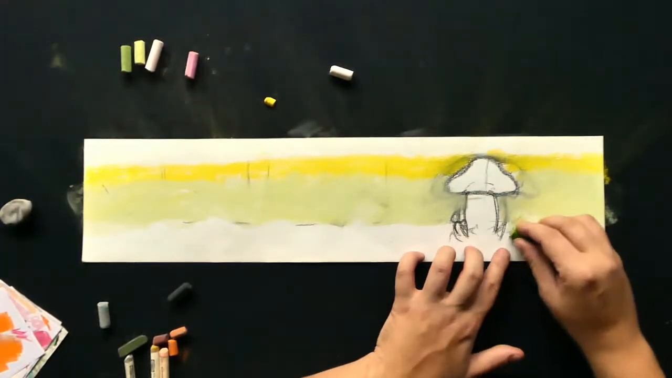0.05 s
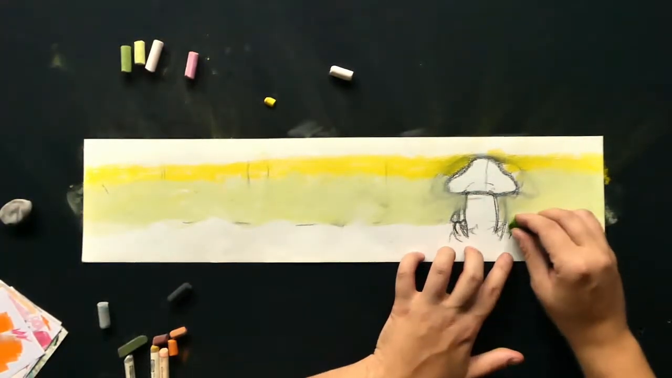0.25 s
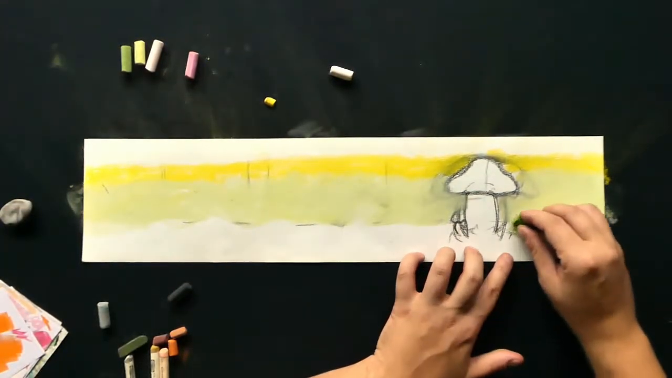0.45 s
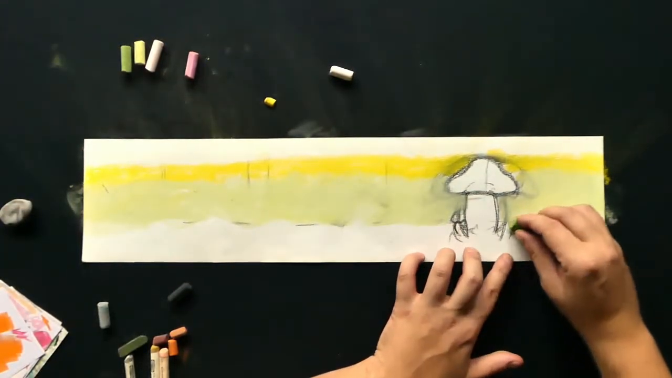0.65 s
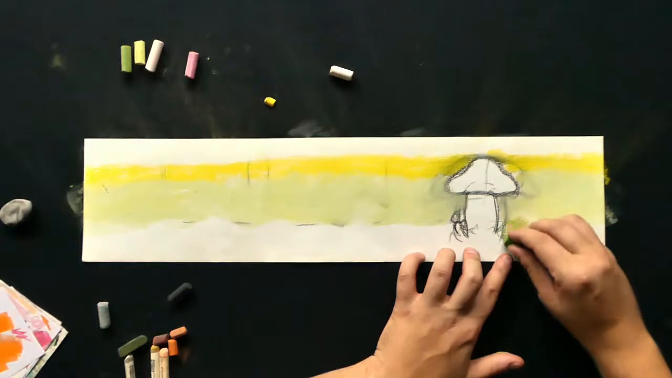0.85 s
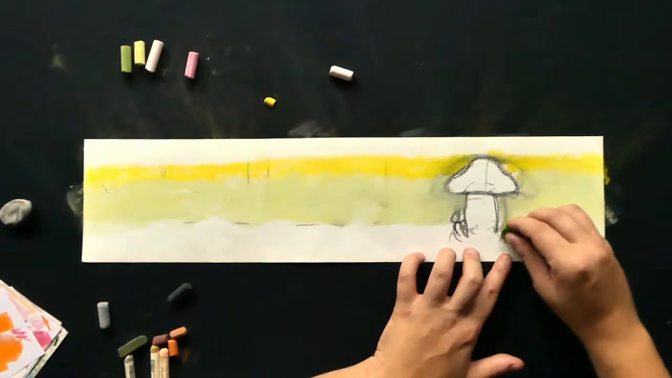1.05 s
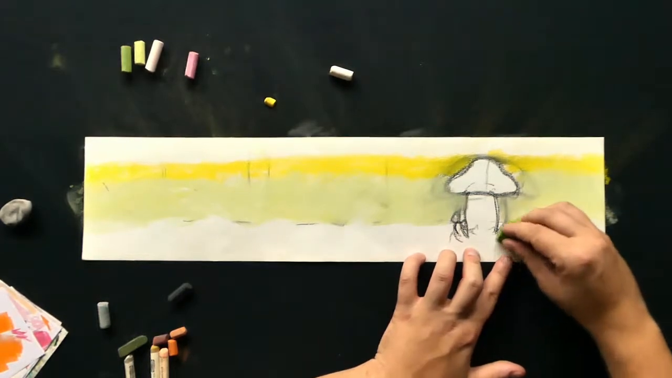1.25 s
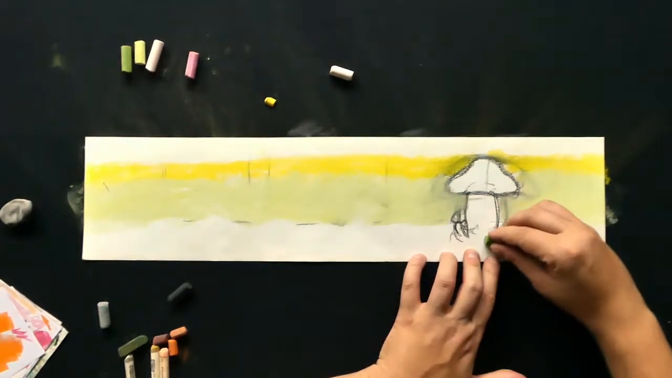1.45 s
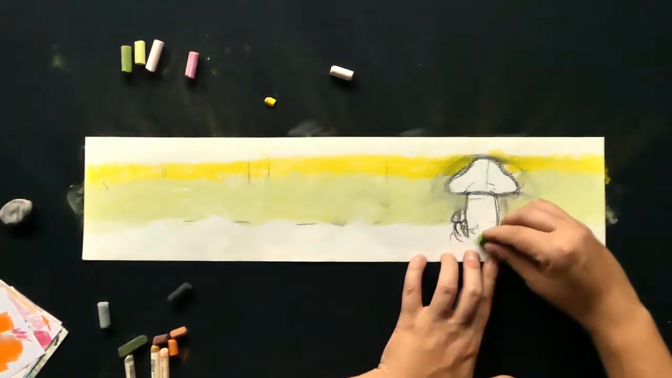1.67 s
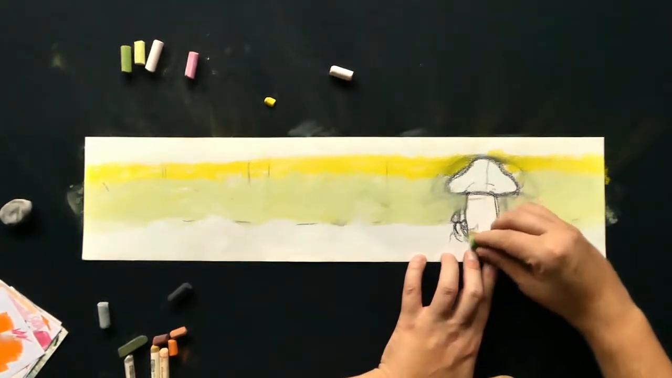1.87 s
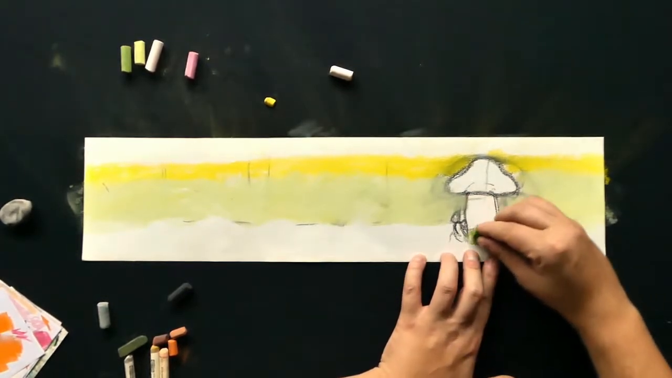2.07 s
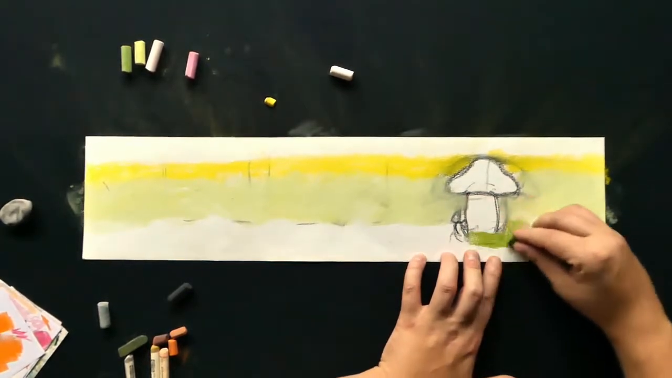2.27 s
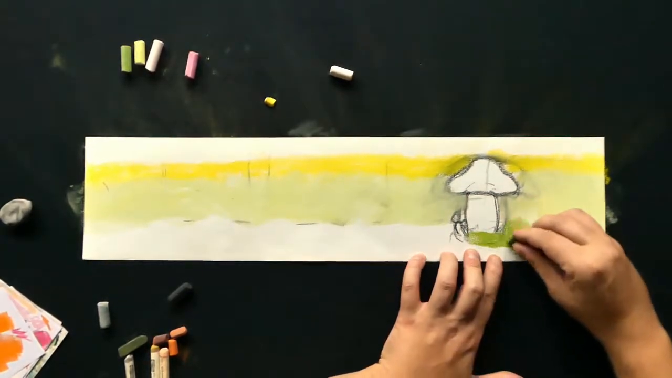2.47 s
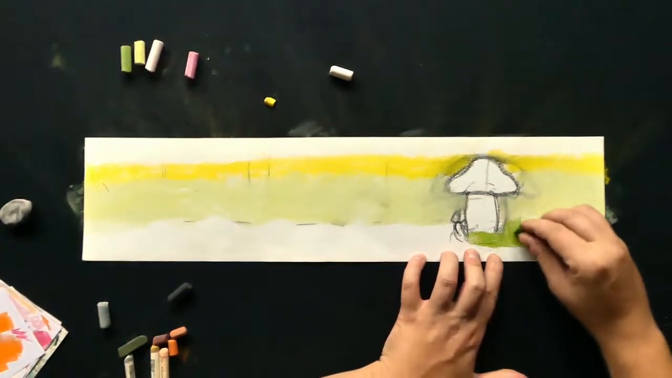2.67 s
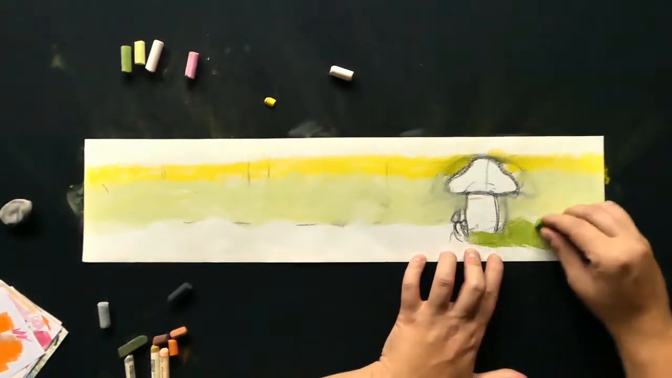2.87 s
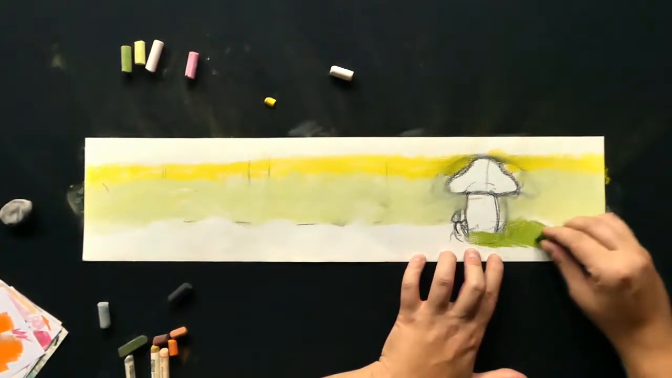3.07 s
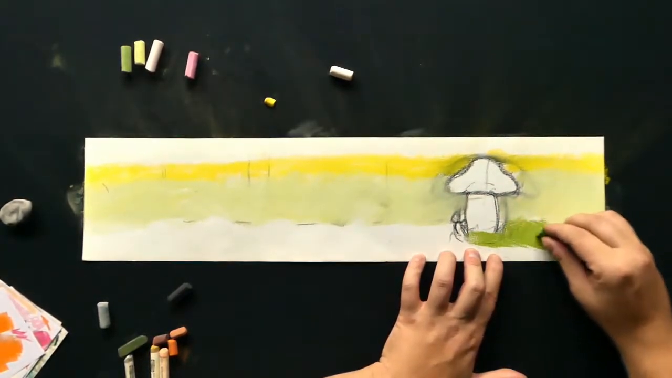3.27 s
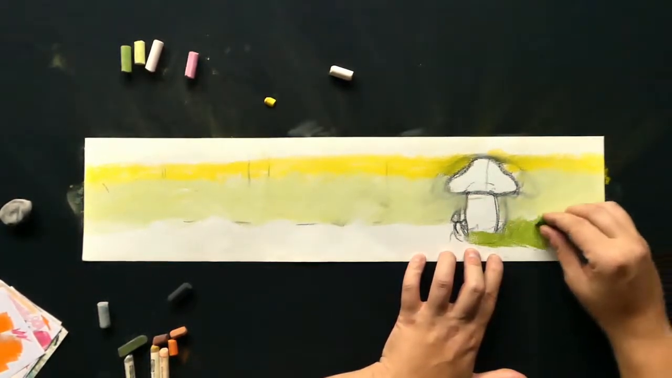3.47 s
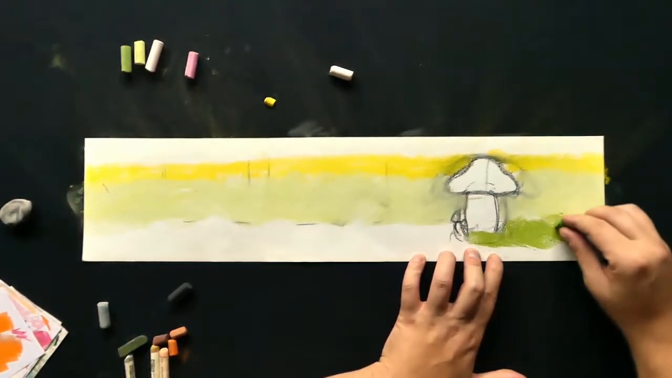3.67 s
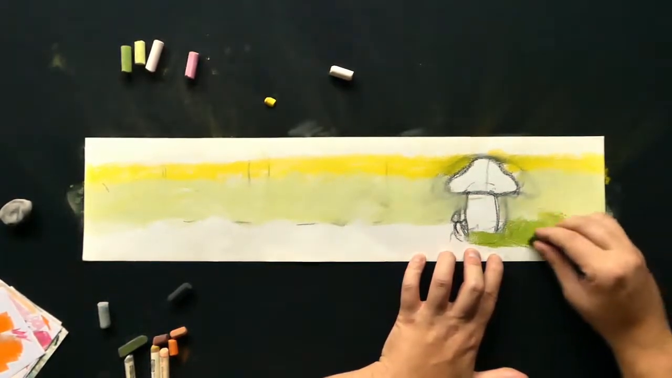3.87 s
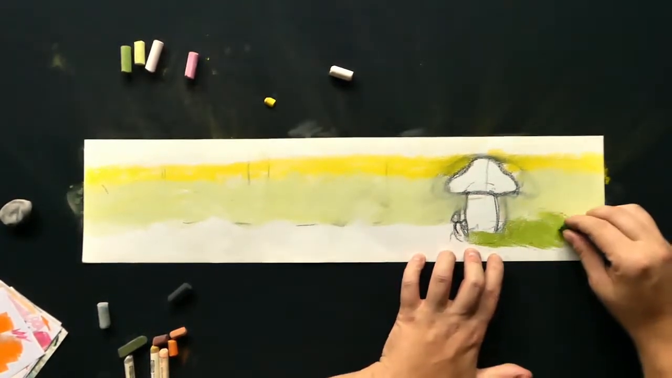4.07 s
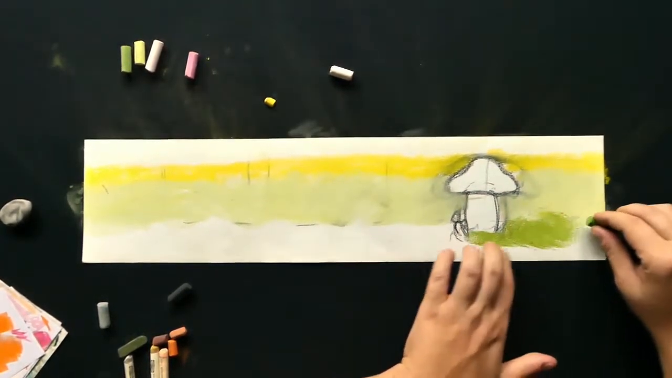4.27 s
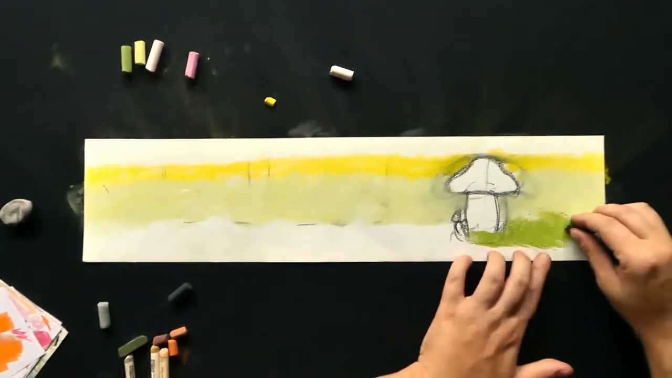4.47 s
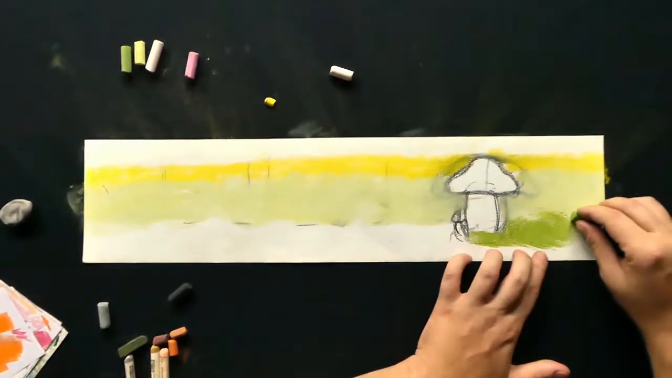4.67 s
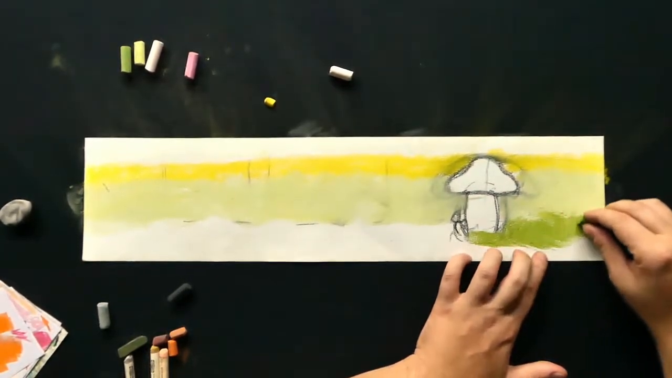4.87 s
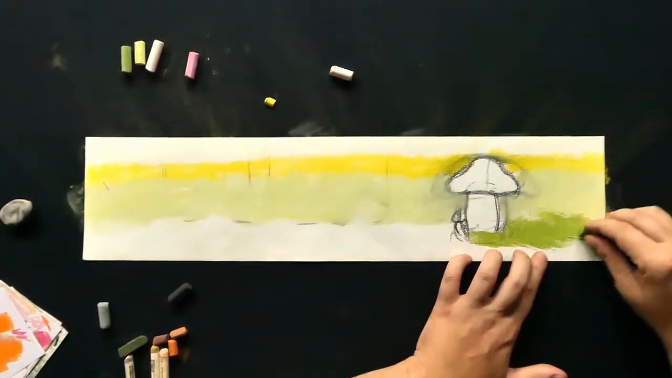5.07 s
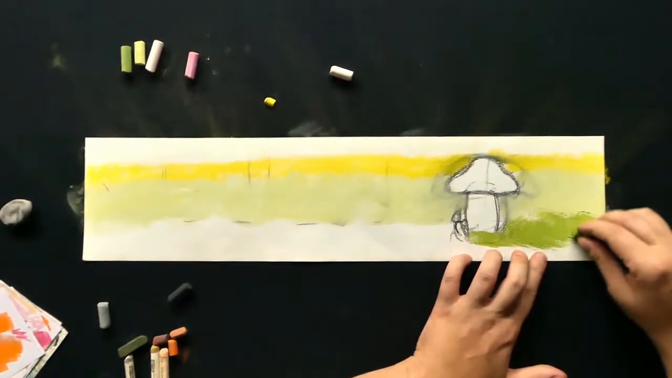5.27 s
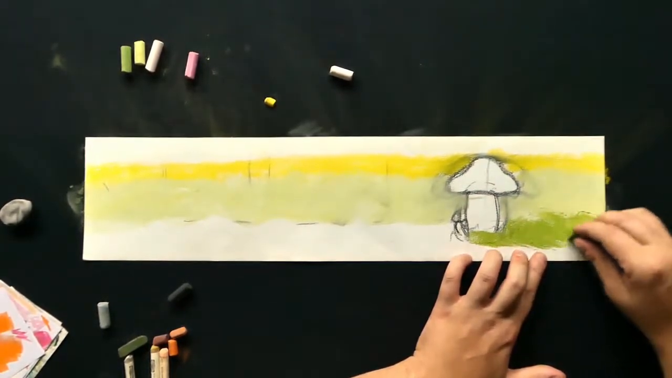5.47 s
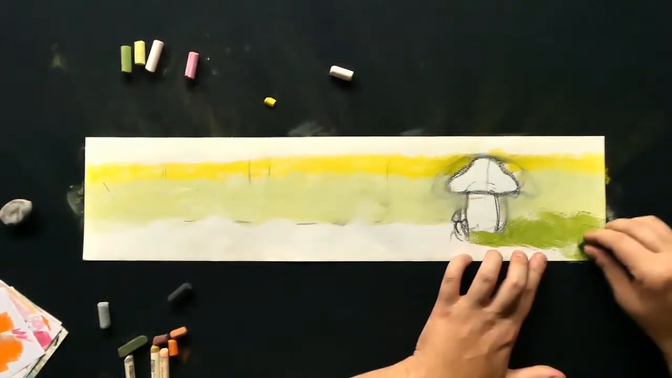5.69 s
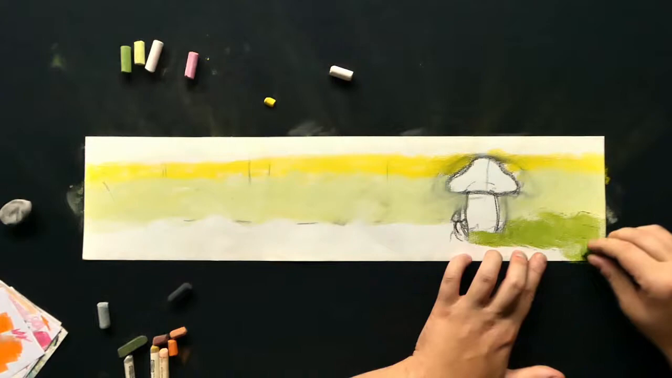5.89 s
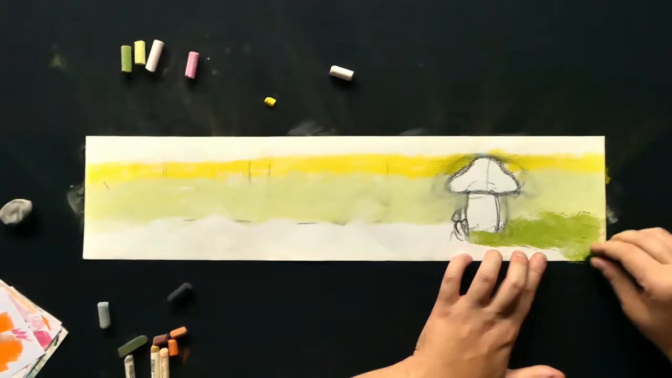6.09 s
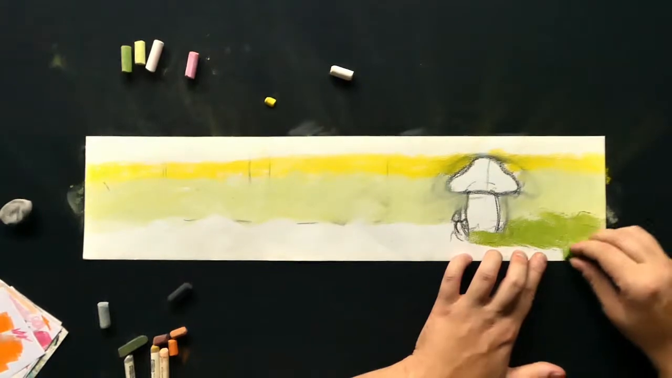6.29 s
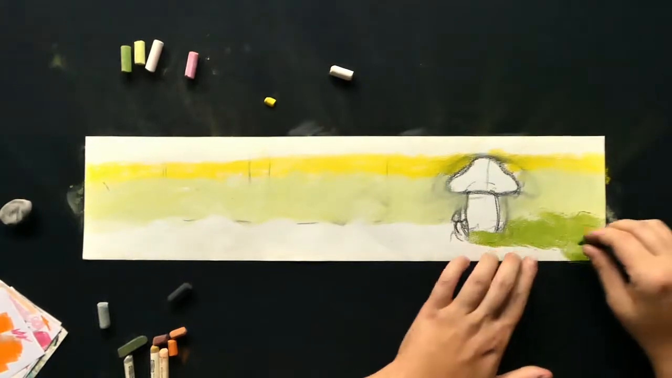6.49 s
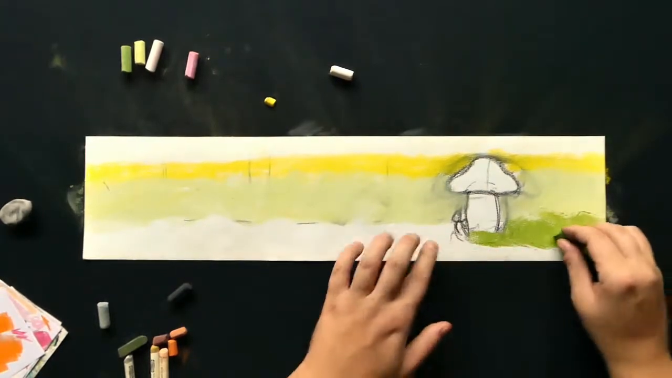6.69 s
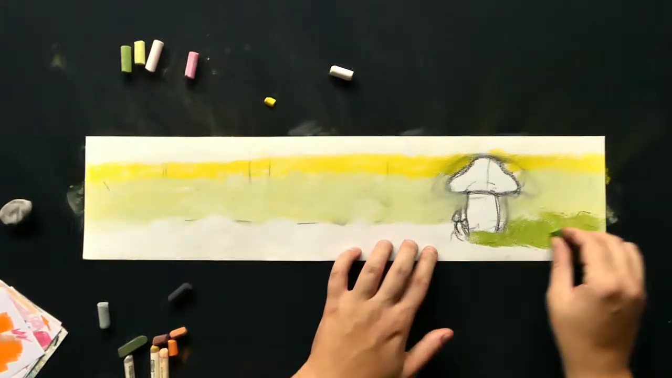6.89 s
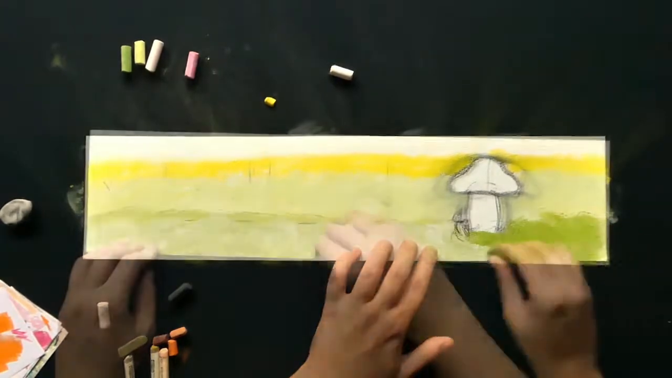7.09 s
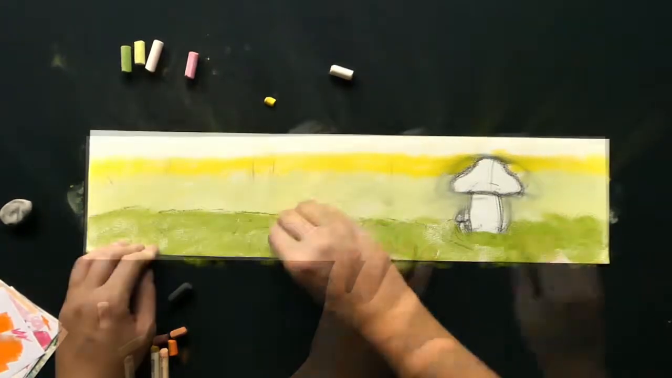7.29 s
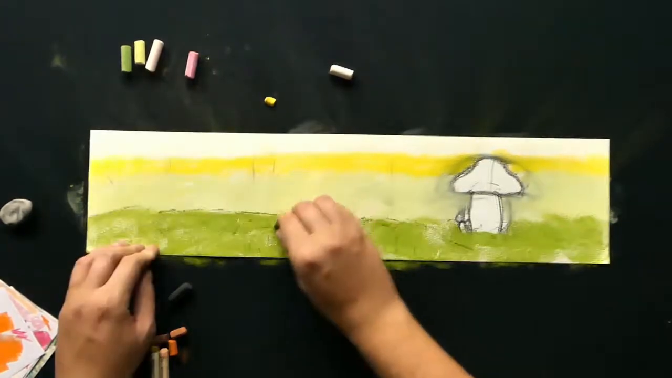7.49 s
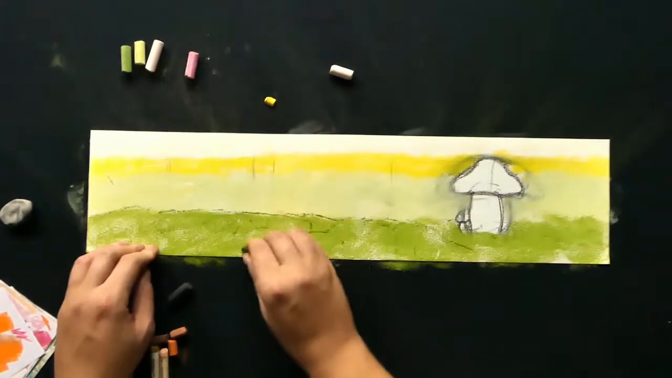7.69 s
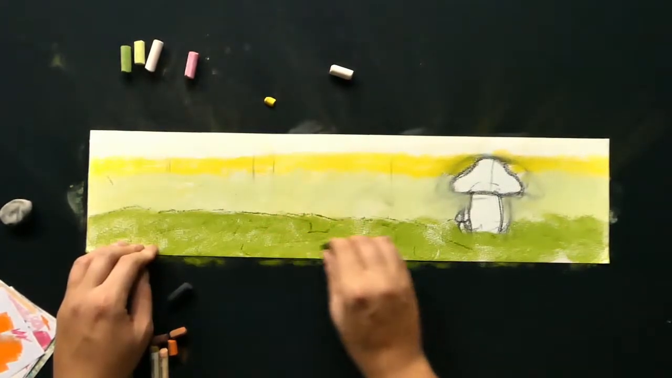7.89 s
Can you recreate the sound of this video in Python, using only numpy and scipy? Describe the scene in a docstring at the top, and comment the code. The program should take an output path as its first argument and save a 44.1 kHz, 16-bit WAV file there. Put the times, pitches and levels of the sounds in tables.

```python
"""A bright, dry rasp scrubs to and fro: a pastel stick on thin paper, close under a mono microphone.
The rasp is clumpy grit noise, coloured from dull to bright; the sheet under the stick and the table top
answer lower down through their own modes. Twice the stick lifts, ticks as it lands again and knocks
the table. The arm rumbles softly on the wood, short reflections follow, and a quiet room hums behind."""
import sys
import numpy as np
from scipy import signal
from scipy.fft import rfft, irfft, next_fast_len
from scipy.io import wavfile
from scipy.ndimage import uniform_filter1d, map_coordinates

SR = 44100
rng = np.random.default_rng(int(sys.argv[2]) if len(sys.argv) > 2 else 0)


def generate_wav(sig):
    """Save sig (samples, or channels by samples) to the path in sys.argv[1] as 16-bit PCM at SR."""
    pcm = np.round(np.clip(np.atleast_2d(sig).T, -1, 1) * 32767).astype(np.int16)
    wavfile.write(sys.argv[1], SR, pcm)


N = 350154

# Strokes of the stick: top_speed_s, rise_s, fall_s (each spans 10 dB, before a layer's linger), rasp_db,
# brightness_db, then relative to the rasp: pinned_patch_db, loose_sheet_db, table_drive_db
STROKES = [(0.003, 0.013, 0.12, -42.5, -4.5, -18.5, -25, -24),
           (0.191, 0.051, 0.046, -44.5, -5.5, -16, -25, -25),
           (0.244, 0.023, 0.051, -46.7, -5.4, -18, -23, -16),
           (0.349, 0.037, 0.062, -52, -6, -18, -17, -8.5),
           (0.433, 0.031, 0.062, -45.7, -5.0, -16, -24, -21.5),
           (0.568, 0.065, 0.082, -50.5, -5.5, -16.5, -17, -11.5),
           (0.707, 0.032, 0.071, -53.5, -5.5, -11, -12.5, -4.5),
           (0.873, 0.059, 0.092, -45, -5.4, -11.5, -15.5, -16),
           (1.023, 0.023, 0.11, -45.5, -5.5, -10.1, -13, -17), (1.15, 0.032, 0.076, -46, -5, -12, -19, -16),
           (1.291, 0.023, 0.087, -48.5, -5.5, -10.5, -11.5, -15.5),
           (1.381, 0.07, 0.071, -46.5, -5, -8.5, -14.5, -21),
           (1.527, 0.022, 0.098, -52, -5.5, -8.9, -8.5, -15), (1.6, 0.03, 0.071, -52.5, -5, -14, -6.5, -12),
           (1.789, 0.074, 0.17, -49.5, -5.3, -8, -6.5, -14.5),
           (2.012, 0.085, 0.028, -43.5, -5, -8.5, -12, -25),
           (2.108, 0.089, 0.14, -49.5, -6, -5.2, -4.5, -17.0),
           (2.265, 0.026, 0.013, -38.5, -4, -18, -34, -35), (2.315, 0.14, 0.043, -42.5, -5, -7.5, -25, -31),
           (2.405, 0.08, 0.054, -47.5, -6, -6.5, -12.9, -17.5),
           (2.511, 0.029, 0.16, -46.9, -6, -10, -20, -19.5), (2.605, 0.048, 0.089, -42.5, -5, -7, -12, -21),
           (2.743, 0.045, 0.11, -43.6, -6.0, -7.5, -13, -19.5),
           (2.867, 0.066, 0.102, -41, -5.0, -7, -12.5, -29),
           (3.029, 0.11, 0.078, -43.5, -5, -5, -11, -19.5),
           (3.137, 0.038, 0.082, -39.5, -5.5, -7, -14.5, -29),
           (3.308, 0.16, 0.066, -49, -5, -5.5, -8.3, -15),
           (3.399, 0.053, 0.06, -39, -5.5, -7.5, -16.5, -28.5),
           (3.504, 0.058, 0.07, -42, -5.5, -7, -12.5, -25),
           (3.684, 0.122, 0.064, -44.0, -6, -6.3, -13, -18), (3.755, 0.032, 0.12, -45, -5.9, -4.5, -7, -23),
           (3.862, 0.05, 0.14, -41.5, -5, -7.5, -30, -26), (4.03, 0.11, 0.063, -39, -5.5, -7, -14, -20),
           (4.154, 0.022, 0.084, -55, -6.5, -6.5, -13, -12), (4.28, 0.015, 0.027, -71, -6, -13, -12, -11),
           (4.325, 0.018, 0.018, -69, -5, -4, -9.0, -14),
           (4.539, 0.043, 0.04, -56.5, -12.2, -12, -21, -8.8),
           (4.611, 0.051, 0.048, -56.5, -9.5, -9.5, -12.5, -2.5),
           (4.71, 0.038, 0.049, -46.5, -6.5, -8.5, -13.1, -18),
           (4.8, 0.028, 0.115, -45, -7, -8, -12, -13.5), (4.914, 0.035, 0.074, -41, -5.5, -6, -14.5, -25),
           (5.044, 0.079, 0.1, -47, -6, -6.0, -13.5, -18), (5.154, 0.055, 0.1, -41.5, -6, -6, -11.5, -24),
           (5.323, 0.035, 0.12, -41, -6.5, -7.3, -15.5, -18.5),
           (5.437, 0.034, 0.073, -44, -5, -5, -17, -33), (5.561, 0.066, 0.11, -40, -5, -8.5, -16, -33),
           (5.669, 0.11, 0.022, -45.5, -5, -3.5, -12, -21), (5.728, 0.067, 0.057, -40, -6, -6, -15, -19),
           (5.829, 0.047, 0.085, -42, -5.5, -6.5, -11, -20),
           (5.959, 0.063, 0.078, -41.5, -6.5, -6, -15, -18.9),
           (6.072, 0.047, 0.052, -43.5, -6.5, -7.5, -13, -14),
           (6.166, 0.044, 0.1, -41, -6, -7.5, -16.5, -23.5),
           (6.303, 0.068, 0.085, -41, -5.5, -9, -19.5, -23),
           (6.402, 0.016, 0.03, -47.4, -5.5, -5, -14.7, -29),
           (6.435, 0.027, 0.019, -48.5, -6, -8, -26, -34), (6.47, 0.03, 0.065, -63, -6.5, -6, -11, -9),
           (6.834, 0.039, 0.057, -51, -17, -7.5, -30, -22), (6.952, 0.017, 0.05, -45.5, -6, -5, -23, -30.5),
           (6.988, 0.041, 0.11, -33.5, -4.5, -12, -26.5, -28),
           (7.076, 0.057, 0.04, -34, -5.5, 0.5, -20, -29.1),
           (7.217, 0.12, 0.11, -37.5, -6, -9.5, -19.5, -27.5),
           (7.324, 0.11, 0.073, -40.5, -5.5, -2, -34, -24),
           (7.476, 0.049, 0.033, -38, -6, -6.5, -23, -23.8), (7.603, 0.066, 0.082, -35, -6, -3, -20, -26.5),
           (7.856, 0.06, 0.15, -39.5, -6.5, -8.5, -17.5, -26),
           (7.94, 0.1, 0.154, -36.5, -6.5, -11, -16.4, -32)]


def rasp():
    """Faster strokes break finer grains, so the hiss moves from the dull to the bright spectrum."""
    # Spectrum of a slow and of a fast stroke: pitch_hz, relative density_db (per Hz)
    dull = [(2590, -51), (4400, -16.5), (4770, -5), (5900, -5.5), (6770, -6.5), (7540, -8.5), (8290, -12.5),
            (9580, -13.5), (15700, -34)]
    bright = [(2590, -31), (4400, -15.5), (5110, -12.5), (5800, -9.5), (8250, -5), (9180, -1), (12600, -3),
              (14900, -10), (15700, -66)]
    dulling = 0.049  # dB of brightness lost per dB below the top of a stroke

    def shape(hz, t):
        peak_db, bright_db = np.transpose(STROKES)[3:5]
        power = swells(t, peak_db, linger=0.92)
        total = power.sum(0)
        share = power / total
        level_db = 10 * np.log10(total)
        brightness_db = bright_db @ share + dulling * (level_db - peak_db @ share)
        fast = np.clip((brightness_db + 8) / 6, 0, 1.4)  # 0 is dull, 1 is bright
        return (1 - fast) * along(dull, hz) + fast * along(bright, hz), level_db

    return radiate(grit(rough_db=1.5, clump_db=0.5), shape, patchy_db=1.5, size=256)


def sheet():
    """The loose sheet sounds low, the small patch pinned under the stick higher."""
    # What the loose sheet and the pinned patch radiate: pitch_hz, relative density_db (per Hz)
    loose_spectrum = [(600, -24), (950, -1.5), (1500, -2), (2080, -0.5), (2250, -6), (3000, -24)]
    patch_spectrum = [(1500, -34), (2150, -3.5), (2700, -1), (3600, -0.5), (4500, -4), (6000, -18)]
    # Resonances of sheet and patch: pitch_hz, width (in natural log of frequency)
    sheet_modes = [(1170, 0.08), (1620, 0.069), (1990, 0.02)]
    patch_modes = [(2880, 0.055), (3550, 0.035), (4350, 0.066)]
    peak_db, _, patch_db, sheet_db = np.transpose(STROKES)[3:7]
    loose = paper(peak_db + sheet_db, 1.384, sheet_modes, loose_spectrum, between_db=-12.5, order=0, size=512)
    patch = paper(peak_db + patch_db, 1.04, patch_modes, patch_spectrum, between_db=-12.5, order=3, size=256)
    return loose + patch


def paper(peak_db, linger, modes, spectrum, between_db, order, size):
    """Paper modes stay put; moving the stick changes how strongly each is driven."""
    # Coupling of the spot under the stick: time_s, three sheet modes, three patch modes
    # (coupling in dB, before the stretch below)
    spot = [(0, -3, -14, -11, -4, -3, -4), (.7, -5, -6, -11, -3, -2, -5), (.9, -4, -3.5, 0, -4, -9, -5),
            (1.4, -6, -4, -4, -1.5, -3, -1.5), (1.52, 0.5, -4, 2.5, -2, -3, -2),
            (1.95, 0, -0.5, 2.5, -4, -3.5, -8), (2.3, 0, 0.5, 3.5, -1.5, -1.5, 3.5),
            (2.6, -6, -1, -1.5, -8, -10, -11), (2.95, -13, -3.5, -4.5, -10, -7, -9),
            (3.2, -2, 1.5, -4, -7, -4.5, -5), (3.3, -2, -2, -9, -9, -2, -6), (3.5, -5, -3, -16, -4, -5, -5),
            (3.65, -16, -4, -2, -11, -4, -7.5), (3.8, -6, 0, -8, -7, -6, -6), (4.05, -5, -2, 0, -4, -4, -5),
            (4.3, 9, -1, -14, -12, -2, -4), (4.8, -7, -5.5, -6, -1.5, -17, -14),
            (5.2, -19, -2, -3, -5, -13, -4), (5.6, -11, -4.5, -5, -8, -12, -11),
            (5.95, -16, -3, -2.5, -7, -12, -5), (6.1, -14, -5, -2.5, -4.5, -12, -3),
            (6.4, -8, -5.5, -4, -5, -3.5, -7), (6.8, 6, -4, -5, -11, 5, 5), (7.08, -19, -5, 0.5, 3, -4, -2),
            (7.35, -13, -3, -3.5, -7, -1, -0.5), (7.6, -9, -3, -3.5, -10, -4, -0.5),
            (7.94, -7, -14, -1, -1, -4, -9)]

    def shape(hz, t):
        power = amp(2 * between_db)  # floor between the modes
        for (peak_hz, width), coupling in zip(modes, curves(spot, t)[order:]):
            coupling = coupling + wobble(t, rate=10)  # chance wander
            offset = np.log(hz / peak_hz + 1e-9) / width
            power = power + amp(4.3 * coupling) / (1 + offset ** 2)  # stretches the coupling dB 2.15 times
        colour_db = along(spectrum, hz) + 10 * np.log10(power)
        level_db = 10 * np.log10(swells(t, peak_db, linger).sum(0))
        return colour_db, level_db

    return radiate(grit(rough_db=3, clump_db=0.5), shape, patchy_db=1.5, size=size)


def table():
    """Rubbing and the landing hand drive the table modes, each more or less as the stick moves."""
    # Resonances of the wood: pitch_hz, width_hz, gain_db
    wood = [(280.6, 17, -11.5), (402, 60, -9), (530, 26, 1.5), (644, 25, -3.5), (725, 17.5, -1),
            (789.6, 5.3, 5.5), (835, 33.5, -0.5), (896, 24, -4.5), (978, 18, -6)]
    # The hand lands on the table: start_s, level_db (before the strike gain), thud_db (relative to level_db)
    knocks = [(4.506, -72, 5), (4.541, -50.5, -11), (5.728, -57, -25), (6.771, -57, -4)]
    # Drive of the modes above 600 Hz, relative to the lower ones: time_s, gain_db
    upper = [(0, 2.5), (.8, -2.5), (1.5, 0), (2.5, 2), (3.3, 5), (4.2, -1.5), (4.55, -8.5), (4.8, 1),
             (5.8, 2.5), (6.4, 0.5), (6.78, -11), (6.9, -3), (7.1, -1.5), (7.94, 5)]
    t = np.arange(N) / SR
    upper_db, = curves(upper, t)

    strokes, coarse = np.transpose(STROKES), t[::100]
    swell = np.sqrt(swells(coarse, strokes[3] + strokes[7], linger=1.58).sum(0))
    press = np.interp(t, coarse, swell)
    force = amp(18.5) * press * grit(rough_db=-1.0, clump_db=3.0)

    out = np.zeros(N)
    u = t[:SR // 5]
    for s, db, thud_db in knocks:
        span = slice(round(s * SR), round(s * SR) + len(u))
        force[span] += amp(db + 21.0 - 60 * u / 0.24) * rng.standard_normal(len(u))
        onset = 1 - np.exp(-u / 0.0063)
        # the thud bypasses the modes
        out[span] += amp(db + thud_db - 60 * u / 0.23) * np.sin(2 * np.pi * 140 * u) * onset

    for k, (hz, width, db) in enumerate(wood):
        place = wobble(t, rate=9)  # how well the spot couples to this mode
        drive = force * amp(2.0 * place + upper_db * (hz > 600))
        out += (-1) ** k * filtered(drive, mode(hz, width, db))
    return out


def ticks():
    """A contact pushes and lets go: a short one rings a few cycles, a long one scuffs; grit rattles after it."""
    # The stick ticks on the paper: start_s, level_db (before the high-pass), pitch_hz, contact_s
    taps = [(2.2548, -27, 7900, .0002), (2.2577, -27, 8600, .0002), (2.2669, -28, 6700, .0002),
            (4.5032, -30, 5600, .0002), (4.5191, -31.3, 5800, .00015), (4.533, -46, 5700, .004),
            (6.4344, -33, 6400, .0002), (6.8125, -28.4, 5400, .00015), (6.8335, -28.1, 5600, .0002),
            (6.8405, -28.4, 5200, .00015), (6.8548, -28.6, 6500, .00015)]
    out, t = np.zeros(N + SR), np.arange(SR // 25) / SR
    for s, db, hz, contact in taps:
        push = t / contact * np.exp(1 - t / contact)
        # random phase roughens only the long contacts
        slip = np.cumsum(.2 * rng.standard_normal(len(t))) * (contact > .001)
        rattle = amp(-39 - 60 * t / 0.022) * rng.standard_normal(len(t))
        # a burst of noise sharpens only the short contacts
        edge = amp(-14) * (contact < .001) * np.exp(-t / contact) * rng.standard_normal(len(t))
        ring = (push + rattle) * np.sin(2 * np.pi * hz * t + slip)
        out[round(s * SR):][:len(t)] += amp(db) * (ring + edge)
    return filtered(out[:N], lambda f: (1j * f / (1500 + 1j * f)) ** 2)


def arm():
    """The arm rumbles softly on the table, louder for a moment when it shifts."""
    # Rumble of the arm on the table: pitch_hz, gain_db (before scaling to unit level)
    rumble_spectrum = [(60, -24), (110, 1.5), (190, 0), (270, 6.5), (340, -17)]
    # The arm resting on the table: time_s, level_db (before the slight scaling below)
    drag = [(0, -81.5), (1.5, -82), (2.5, -77), (4.2, -74), (4.3, -91), (4.5, -81), (4.7, -78), (6.48, -76),
            (6.7, -90), (6.85, -77), (7.94, -75.5)]
    # The arm shifts its weight: peak_s, level_db
    shifts = [(.05, -67), (1.18, -72), (1.65, -78), (1.98, -72), (2.27, -69), (2.51, -66), (3.3, -70),
              (3.64, -67), (4.13, -65), (4.54, -63.5), (4.83, -78), (5.07, -76), (6.79, -69.5), (7.48, -74)]
    rise_s, fall_s = 0.025, 0.054  # 10 dB of swell and of fade
    t = np.arange(N) / SR
    power = amp(1.98 * curves(drag, t)[0])  # 0.99 of the level in dB
    for s, db in shifts:
        away = (t - s) / np.where(t < s, rise_s, fall_s)
        power = power + amp(2 * (db - 10 * away ** 2))
    rumble = unit(filtered(rng.standard_normal(N), lambda hz: amp(along(rumble_spectrum, hz))))
    return np.sqrt(power) * rumble


def walls(x):
    """The room's answer: a noise tail, each frequency dying at its own speed, weak in the bass."""
    # Decay of the reflections: pitch_hz, t60_s
    decay = [(300, 0.64), (2000, 0.1), (10000, 0.017)]
    hz, t, z = signal.stft(rng.standard_normal(SR // 2), SR, nperseg=256)
    fade = amp(-60 * t / along(decay, hz)[:, None])
    tail = signal.istft(z * fade, SR, nperseg=256)[1]
    thin = filtered(x, lambda f: 1j * f / (1500 + 1j * f))
    delayed = np.pad(thin, (200, 0))  # samples before the first reflection
    return signal.fftconvolve(delayed, tail / np.linalg.norm(tail))[:N]


def room():
    """Hum and hiss of the room: coloured steady noise, a little uneven."""
    # Room tone: pitch_hz, relative density_db (per Hz)
    tone = [(12, -48), (20, -24), (47, -21), (70, -36), (93, -17.5), (316, -18), (364, -3), (407, -11),
            (888, -20), (2230, -16.5), (2420, -20), (9770, -30), (15700, -38)]
    level_db = -70

    def shape(hz, t):
        return along(tone, hz) + 0 * t, level_db

    return radiate(rng.standard_normal(N), shape, patchy_db=1.2, size=1024)


def grit(rough_db, clump_db):
    """Friction force: grains of uneven size snapping off, coming in clumps a few ms long."""
    sizes = amp(rough_db * np.clip(rng.standard_normal(N), -2, 2))
    smooth = uniform_filter1d(rng.standard_normal(N), size=160)
    clumps = unit(uniform_filter1d(smooth, size=90))
    return unit(rng.standard_normal(N) * sizes * amp(clump_db * clumps))


def swells(t, peak_db, linger):
    """Power of each stroke (rows) at times t: it speeds up, peaks and slows for the turn."""
    s, rise, fall = np.transpose(STROKES)[:3, :, None]
    away = np.abs(t - s) / (linger * np.where(t < s, rise, fall))
    return amp(2 * (peak_db[:, None] - 10 * away ** 1.78)) + 1e-14  # exponent rounds the swell


def radiate(force, shape, patchy_db, size):
    """The force through a spectrum shape(hz, t) -> (colour dB, level dB), with patches of chance gain."""
    overlap = size * 3 // 4
    hz, t, z = signal.stft(force, SR, nperseg=size, noverlap=overlap)
    colour_db, level_db = shape(hz[:, None], t)
    across_hz = uniform_filter1d(rng.standard_normal(z.shape), size=4, axis=0)
    patches = unit(uniform_filter1d(across_hz, size=30, axis=1))
    gain = amp(colour_db + patchy_db * patches)
    # even out the colour's loudness at each moment, then apply the level
    gain = gain / np.sqrt(np.mean(gain ** 2, axis=0)) * amp(level_db)
    return signal.istft(z * gain, SR, nperseg=size, noverlap=overlap)[1][:N]


def mode(hz, width, db):
    """Frequency response of one causal resonance."""
    return lambda f: amp(db) * 1j * f * width / (hz * hz - f * f + 1j * f * width)


def filtered(x, response):
    """x through a complex response of frequency, padded so that tails do not wrap round."""
    m = next_fast_len(N + SR // 2)
    return irfft(rfft(x, m) * response(np.fft.rfftfreq(m, 1 / SR)), m)[..., :N]


def wobble(t, rate):
    """A smooth random curve, rate knots a second."""
    return map_coordinates(rng.standard_normal(300), [t * rate])


def along(points, hz):
    """(Hz, value) points read on a log frequency axis."""
    f, v = np.transpose(points)
    return np.interp(np.log(hz + 1), np.log(f + 1), v)


def curves(rows, t):
    """Columns after the time, read at times t."""
    s, *cols = np.transpose(rows)
    return [np.interp(t, s, c) for c in cols]


def amp(db):
    """dB to gain."""
    return 10 ** (np.asarray(db) / 20)


def unit(x):
    """Scaled to rms 1."""
    return x / np.sqrt(np.mean(x ** 2) + 1e-20)


def scene():
    """One microphone feeds both channels."""
    near = rasp() + sheet() + table() + arm() + ticks()
    mono = near + amp(-10) * walls(near) + room()
    return np.array([mono, mono])


def record(dry):
    """The microphone loses the deep bass; nothing is kept above the band limit."""
    top_hz = 15850
    return filtered(dry, lambda hz: (hz < top_hz) * 1j * hz / (90 + 1j * hz))


dry = scene()
out = record(dry)
generate_wav(out)
```